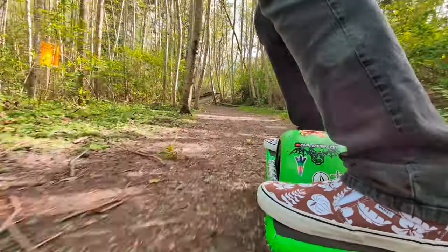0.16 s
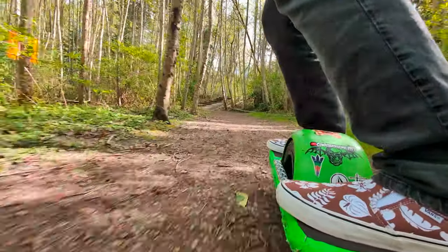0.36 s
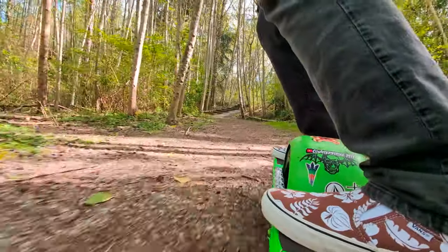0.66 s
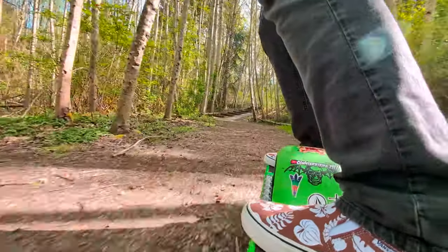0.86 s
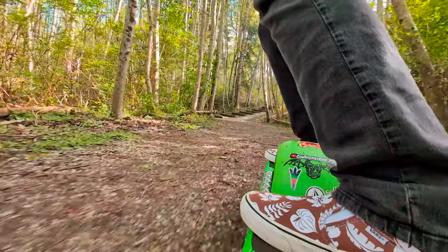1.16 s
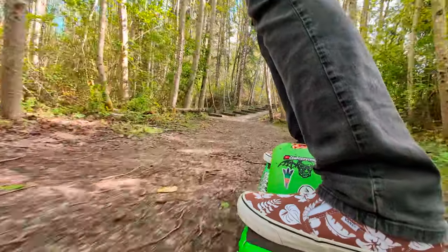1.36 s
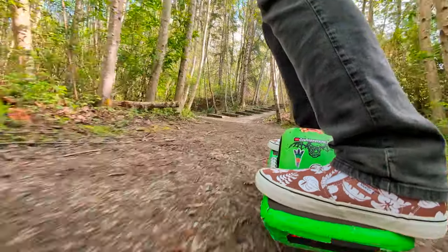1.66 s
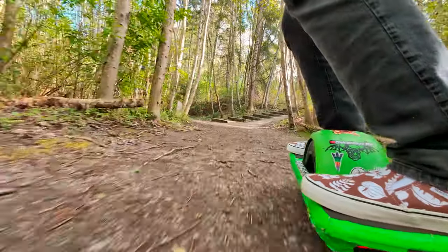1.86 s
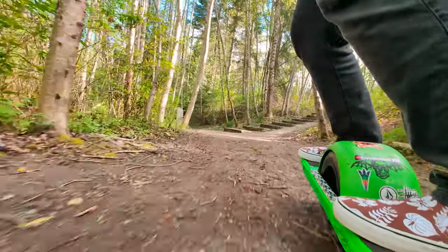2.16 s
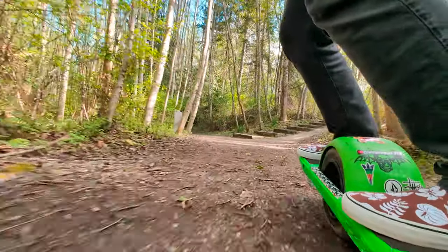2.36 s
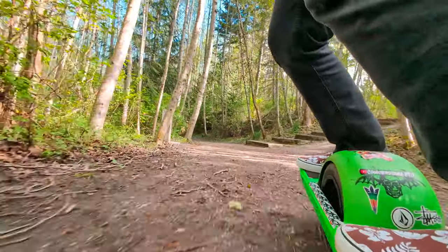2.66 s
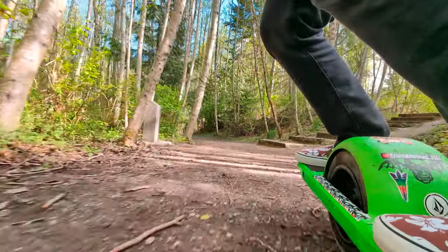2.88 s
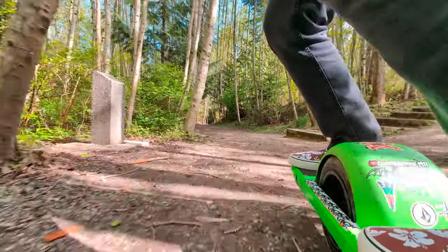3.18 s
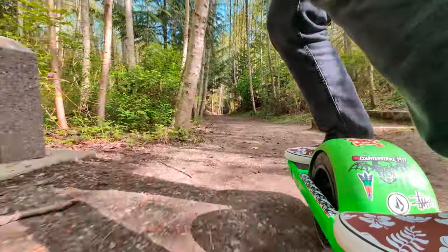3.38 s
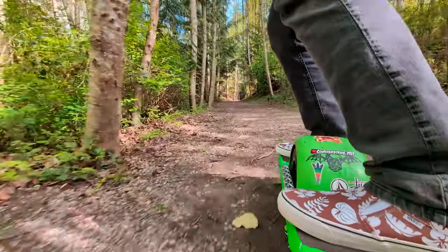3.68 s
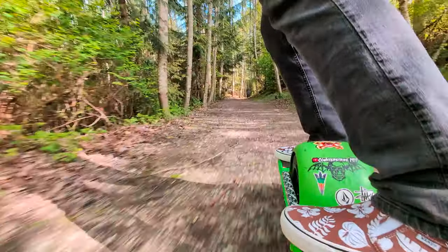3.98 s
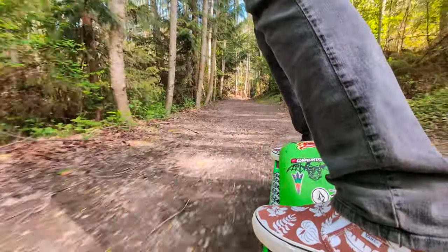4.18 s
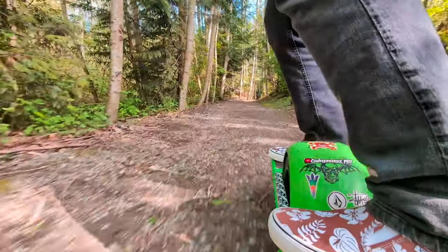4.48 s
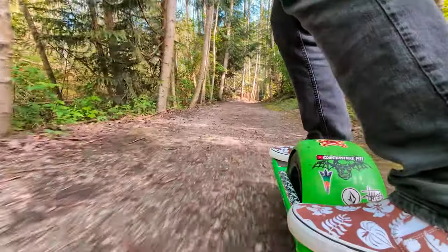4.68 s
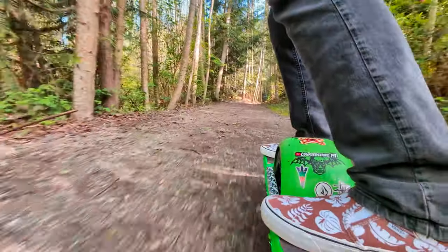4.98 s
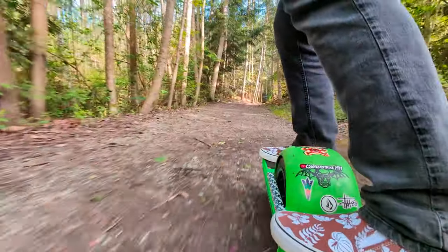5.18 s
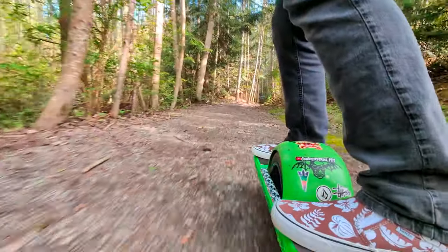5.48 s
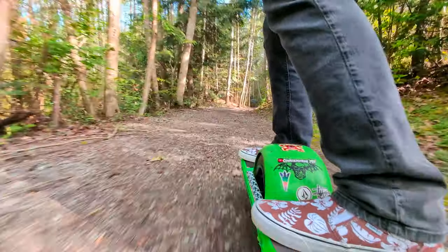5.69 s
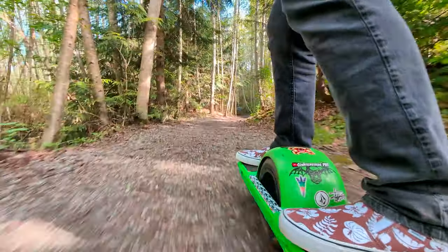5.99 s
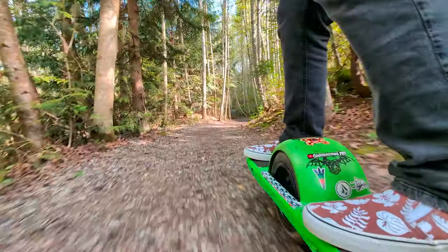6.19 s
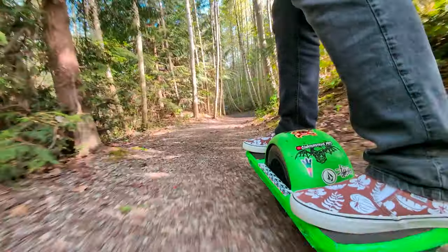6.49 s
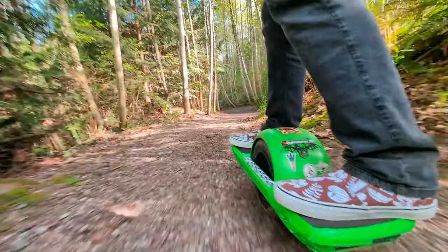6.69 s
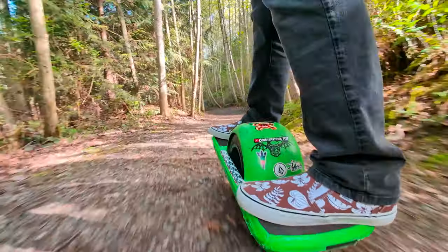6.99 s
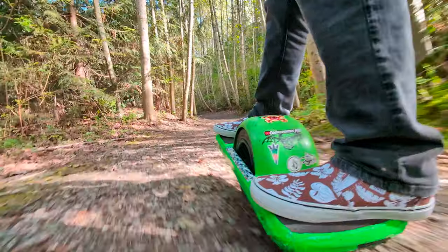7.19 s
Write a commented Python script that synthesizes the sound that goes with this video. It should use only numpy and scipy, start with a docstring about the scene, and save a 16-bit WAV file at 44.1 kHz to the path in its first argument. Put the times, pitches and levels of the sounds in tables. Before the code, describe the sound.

A one-wheeled electric board rolls steadily along a dirt and gravel forest trail, with the microphone very close and low in moving air. A hollow, wavering tire roar continues throughout, covered by granular crunch, tiny crackles and sandy hiss, leaning slightly right. From 0 to 2 s strong, low, irregular wind thumps buffet each side separately, mixed with short thuds and stone pops. From about 2 to 3.5 s wind drops and the tire is clearer; bright chips click sharply around 2.2-2.4 s and a stone pops hard at 2.65 s. Gusts return from 3.6 to 5 s, with a thud near 4.6 s, then thin out. Grit thickens after 5.5 s, with a sharp pop at 5.54 s. Crunch swells around 6.5 s with a heavy pop, and clustered pops and ticks at 7.2-7.3 s end it while still rolling. A barely audible, very high motor whine wavers beneath.

```python
"""Tyre roar and grit crunch under gusty wind thumps: a one-wheeled electric board on a dirt and gravel trail.
Tyre: noise flaring with each crushed grain, in four spectra from roar to hiss. Short ringing thuds are sines.
Stones pop as bent decaying sines, chips tick through a broad resonance, grains crack singly and in runs.
Wind: short noise swirls thump each microphone port separately over a lumpy draught; some spit in crack runs.
Motor: two faint sine lines."""
import sys
import numpy as np
from scipy import signal
from scipy.fft import rfft, irfft, next_fast_len
from scipy.io import wavfile
from scipy.ndimage import uniform_filter1d, map_coordinates

SR = 44100
rng = np.random.default_rng(int(sys.argv[2]) if len(sys.argv) > 2 else 0)


def bounce(signal):
    """Save signal as a 16-bit WAV file at the path given by the first command-line argument."""
    frames = np.transpose(np.atleast_2d(signal))
    limited = np.clip(frames, -1, 1)
    pcm = np.round(limited * 32767).astype(np.int16)
    wavfile.write(sys.argv[1], SR, pcm)


N = 323902


def amp(db):
    """Decibels to gain."""
    return 10 ** (np.asarray(db) / 20)


def unit(x):
    """Scale to rms 1."""
    return x / np.sqrt(np.mean(x ** 2) + 1e-20)


def along(points, hz):
    """Read (Hz, value) points on a log axis."""
    point_hz, values = np.transpose(points)
    return np.interp(np.log(hz + 1), np.log(point_hz + 1), values)


def curves(rows):
    """One value per sample for each column after the time."""
    time_s, *columns = np.transpose(rows)
    return [np.interp(np.arange(N) / SR, time_s, column) for column in columns]


def humps(rows):
    """Sum of smooth dB humps from (middle s, half length s, dB) rows."""
    t = np.arange(N) / SR
    return sum(db * np.exp(-((t - middle_s) / half_s) ** 2) for middle_s, half_s, db in rows)


def wobble(rate_hz):
    """Smooth random curve with rate_hz knots a second."""
    knots = rng.standard_normal(int(N * rate_hz / SR) + 4)
    return map_coordinates(knots, [np.arange(N) * rate_hz / SR])


def filtered(x, response):
    """Apply a complex response of frequency."""
    n = x.shape[-1]
    m = next_fast_len(n + SR // 8)
    return irfft(rfft(x, m) * response(np.fft.rfftfreq(m, 1 / SR)), m)[..., :n]


def add(track, start_s, sound):
    """Mix a sound into the track from start_s on."""
    start = round(start_s * SR)
    a, b = max(start, 0), min(start + sound.shape[-1], N)
    track[..., a:b] += sound[..., a - start:b - start]


def burst(direct_s, echo_s, echo_db, size):
    """Contact noise alike at both ports (the straight path), plus diffuse scatter off fender and ground."""
    t = np.arange(size) / SR
    direct = rng.standard_normal(size) * np.exp(-t / direct_s)
    scatter = rng.standard_normal((2, size)) * np.exp(-t / echo_s)
    return direct + amp(echo_db) * scatter


STRAY_SPREAD_DB, STRAY_OCTAVES = 4, 1.0  # full ranges for small stones and chips


def strays(rate_hz, level_db, pitch_hz):
    """Random (s, dB, Hz) rows of small hits whose size follows a level curve."""
    when, size, pitch = rng.random((int(rate_hz * N / SR), 3)).T
    db = level_db[(when * N).astype(int)] + STRAY_SPREAD_DB * (size - .5)
    hz = pitch_hz * 2 ** (STRAY_OCTAVES * (pitch - .5))
    return list(zip(when * N / SR, db, hz))


# motor switching lines: (frequency [Hz], relative level [dB])
WHINE_LINES = [(14039, 0), (14723, -4)]
# motor load: (time [s], whine level before random swell [dB])
MOTOR_LOAD = [(0, -63), (4.1, -63), (4.45, -59), (4.9, -62), (5.15, -55.5), (5.6, -55), (5.85, -65),
              (6.2, -58), (6.5, -64)]


def motor():
    """The drive's switching lines waver in phase and swell with the load."""
    t = np.arange(N) / SR
    lines = sum(amp(db) * np.sin(2 * np.pi * hz * t + 0.8 * wobble(20)) for hz, db in WHINE_LINES)
    return amp(curves(MOTOR_LOAD)[0] + 2 * wobble(4.8)) * lines


# wind spectrum at a port, for an eddy of ordinary size: (frequency [Hz], relative level [dB])
PORT_SPECTRUM = [(20, -28), (40, -2.5), (60, -5.5), (90, -1.5), (170, -0.5), (300, -3.5), (500, -9),
                 (800, -19.5), (1400, -28), (3000, -30.5), (9000, -24)]
EDDY_HZ = 193.5  # eddy pitch at which that spectrum is unshifted


def port(hz, pitch_hz=EDDY_HZ, lag_cycles=1.6):
    """Wind pressure response: small eddies sound higher; lows trail, so each thump sweeps down."""
    gain = amp(along(PORT_SPECTRUM, hz * EDDY_HZ / pitch_hz)) / np.sqrt(1 + (hz / 1100) ** 4)
    # steep bass cut, rings on after each thump
    b, a = signal.butter(N=7, Wn=53, btype="high", analog=True)
    low_cut = signal.freqs(b, a, worN=hz)[1]
    return gain * low_cut * np.exp(-2j * np.pi * lag_cycles * np.log(hz + 20))


# headwind strength: (time [s], reference level [dB])
HEADWIND_LEVEL = [(0.0, -22.5), (0.24, -29), (0.75, -23.5), (1.14, -26.5), (1.69, -31), (1.88, -35),
                  (2.19, -42), (3.33, -40), (4.11, -25), (4.21, -31), (5.46, -36), (6.44, -30),
                  (6.66, -34.5), (7.34, -37.5)]
SMALL_EDDY_RATE_HZ, SMALL_EDDY_S = 9, 0.018
SMALL_EDDY_DB, SMALL_EDDY_SPREAD_DB = 5, 3.5  # over the headwind, full range
SMALL_EDDY_HZ, SMALL_EDDY_OCTAVES = 195, 0.96  # mid pitch, full range
RIGHT_SHARE = .7  # chance of hitting the right port


def small_eddies():
    """Weak eddies at loosely even intervals, level following the headwind; rows like STRONG_EDDIES."""
    jitter, side, size, pitch = rng.random((int(SMALL_EDDY_RATE_HZ * N / SR), 4)).T
    time_s = (np.arange(len(jitter)) + jitter) / SMALL_EDDY_RATE_HZ
    headwind_db = np.interp(time_s, *np.transpose(HEADWIND_LEVEL))
    db = headwind_db + SMALL_EDDY_DB + SMALL_EDDY_SPREAD_DB * (size - .5)
    hz = SMALL_EDDY_HZ * 2 ** (SMALL_EDDY_OCTAVES * (pitch - .5))
    return list(zip(time_s, side < RIGHT_SHARE, db, np.full(len(time_s), SMALL_EDDY_S), hz))


# strong eddies: (time [s], port [0 left, 1 right], level [dB], length [s], pitch [Hz])
STRONG_EDDIES = [(0.028, 1, -15.5, 0.01, 190), (0.084, 0, -18, 0.018, 220), (0.086, 1, -14.5, 0.018, 200),
                 (0.254, 1, -23.5, 0.047, 180), (0.296, 1, -21, 0.027, 130), (0.388, 1, -16, 0.028, 200),
                 (0.418, 0, -10, 0.023, 151), (0.429, 1, -11, 0.019, 232), (0.442, 0, -13, .004, 520),
                 (0.491, 0, -11, 0.013, 245), (0.566, 1, -11.5, 0.017, 170), (0.6, 0, -10, 0.017, 310),
                 (0.615, 1, -19, 0.022, 200), (0.666, 1, -21, .02, 190), (0.69, 0, -21, 0.019, 190),
                 (0.709, 1, -7, 0.032, 235), (0.749, 0, -22, 0.017, 190), (0.8, 0, -14, 0.012, 200),
                 (0.831, 1, -13, 0.02, 300), (0.898, 0, -18, 0.037, 190), (0.906, 1, -16, 0.037, 200),
                 (0.991, 1, -14, 0.024, 340), (1.088, 0, -14, 0.0079, 200), (1.16, 0, -20, 0.016, 200),
                 (1.167, 1, -16, 0.058, 220), (1.23, 0, -13, 0.0084, 380), (1.273, 1, -12.5, 0.008, 230),
                 (1.273, 0, -17, 0.014, 200), (1.343, 0, -20, 0.019, 179), (1.372, 1, -19, 0.016, 190),
                 (1.413, 0, -20.5, 0.044, 187), (1.48, 1, -21, 0.048, 191), (1.513, 0, -15.5, 0.025, 169),
                 (1.529, 0, -19, .005, 480), (1.577, 1, -8.5, 0.021, 304), (1.597, 1, -14, 0.0048, 560),
                 (1.619, 1, -9.5, 0.0085, 181), (1.642, 0, -20, 0.024, 190), (1.649, 1, -13, 0.019, 204),
                 (1.681, 1, -18, .008, 200), (1.712, 1, -12, 0.012, 192), (1.783, 0, -19, 0.018, 190),
                 (1.823, 0, -17, 0.034, 288), (1.842, 1, -17.5, 0.049, 200), (1.88, 1, -9, 0.03, 234),
                 (1.968, 1, -10.5, 0.012, 264), (2.21, 1, -20.5, 0.01, 130), (2.439, 1, -21, 0.025, 138),
                 (2.849, 1, -22.5, 0.024, 260), (3.003, 1, -18, 0.027, 210), (3.243, 1, -25, 0.033, 135),
                 (3.517, 1, -17.5, 0.011, 150), (3.6, 1, -18, .012, 190), (3.626, 1, -11.5, 0.026, 125),
                 (3.668, 1, -20.5, .018, 125), (3.765, 1, -11, 0.018, 224), (3.785, 0, -18, 0.011, 190),
                 (3.86, 1, -17.5, 0.024, 200), (3.911, 1, -9, 0.015, 201), (3.921, 0, -20, 0.04, 200),
                 (4.005, 1, -9, 0.022, 160), (4.055, 1, -22.5, 0.05, 141), (4.06, 0, -22.5, .04, 191),
                 (4.18, 1, -13, 0.016, 192), (4.211, 1, -12, 0.012, 253), (4.223, 0, -17, 0.039, 300),
                 (4.242, 1, -11.5, 0.027, 235), (4.266, 1, -12.5, 0.015, 610), (4.29, 0, -24, 0.037, 190),
                 (4.295, 1, -14, 0.025, 219), (4.322, 1, -19, 0.014, 560), (4.409, 1, -14.5, 0.022, 159),
                 (4.476, 0, -18, 0.023, 190), (4.48, 1, -17.5, 0.021, 170), (4.514, 1, -13.5, 0.021, 172),
                 (4.555, 1, -7.5, 0.0072, 265), (4.704, 1, -14.5, 0.022, 230),
                 (4.774, 1, -11.5, 0.011, 257), (4.825, 1, -14.5, 0.008, 190),
                 (4.878, 1, -13.5, 0.0098, 280), (5.045, 1, -9.5, 0.013, 277), (5.275, 1, -24, 0.013, 190),
                 (5.313, 1, -14, 0.0077, 230), (5.466, 1, -14.5, 0.016, 200), (5.549, 1, -17, 0.023, 203),
                 (6.016, 1, -14.5, 0.02, 194), (6.201, 1, -22, 0.054, 147.3), (6.764, 1, -21, 0.048, 185)]
# gusty, lumpy draught, rows left and right port: (level over the headwind [dB])
DRAUGHT_LEVEL = [
    [-4.5],
    [-0.5],
]


def wind():
    """Short eddies are single thumps, long ones flutter; each port has its own, over a lumpy draught."""
    out, t = np.zeros((2, N)), np.arange(-SR // 8, SR // 5) / SR
    for time_s, side, db, length_s, pitch_hz in STRONG_EDDIES + small_eddies():
        core_s = max(length_s - .007, .003)
        swirl = rng.standard_normal(len(t)) * np.exp(1.15 * rng.standard_normal(len(t)))
        envelope = np.exp(-(t / (0.88 * core_s)) ** 2)
        thump = filtered(swirl * envelope, lambda hz: port(hz, pitch_hz))
        level = amp(db) * np.sqrt(length_s * SR / np.sum(thump ** 2))  # energy of rms db over length_s
        add(out[int(side > .5)], time_s + t[0], level * thump)
    lumps = amp(6.7 * np.array([wobble(22), wobble(22)]))
    draught = unit(filtered(lumps * rng.standard_normal((2, N)), port))
    return out + amp(curves(HEADWIND_LEVEL)[0] + np.array(DRAUGHT_LEVEL)) * draught


# roots under the tyre and hard starts of wind thumps: (time [s], peak level [dB], pitch [Hz])
RINGING_THUDS = [(0.437, -12.5, 710), (0.703, -9, 490), (0.834, -8.5, 545), (1.524, -18, 700),
                 (4.596, -8.5, 563), (4.999, -19.5, 750), (5.047, -12, 530), (6.519, -9, 520),
                 (6.766, -12, 545), (7.301, -11, 547)]


def ringing_thuds():
    """A thud is a sine that swells fast and dies within a few dozen milliseconds."""
    out, t = np.zeros(N), np.arange(SR // 15) / SR
    for time_s, db, hz in RINGING_THUDS:
        ring = np.sin(2 * np.pi * hz * t) * (1 - np.exp(-t / 0.00033)) * np.exp(-t / 0.0038)
        add(out, time_s, amp(db) * ring / abs(ring).max())
    return out


# big chips hitting the board: (time [s], peak level [dB], pitch [Hz], skitter re contact [dB])
BIG_CHIPS = [(0.231, -17, 7000, -16), (0.4846, -13, 5570, -15), (0.536, -14, 7500, -16),
             (0.782, -11.5, 9230, -10), (0.8593, -19, 8500, -18), (1.05, -10, 6300, -14),
             (1.12, -23, 5000, 0), (1.195, -13.5, 5500, -22), (1.4192, -16, 8080, -16),
             (1.453, -18, 8000, -15), (1.661, -19, 8150, -18), (1.8154, -12.5, 6130, -12),
             (2.0154, -15, 5040, -17), (2.124, -14, 8000, -16), (2.182, -13, 9000, -16),
             (2.213, -13, 12000, -20), (2.2285, -14, 4200, -18), (2.2479, 3, 8100, -29),
             (2.2979, -6.5, 7600, -13), (2.3494, -6, 9000, -19), (2.465, -10.5, 6000, -16),
             (2.6503, -12, 5500, -25), (2.7052, -13, 9280, -19), (2.7706, -12.5, 11000, -18),
             (3.004, -11, 9070, -17), (3.058, -12.5, 3540, -13), (3.0985, -16, 8000, -22),
             (3.324, -13, 4500, -14.5), (3.5814, -15, 3600, -20), (3.69, -6.5, 8400, -14),
             (3.6997, -18, 8000, -13), (3.729, -9, 4200, -18), (4.0884, -18, 5600, -4),
             (4.2386, -18, 9140, -8.5), (4.539, -15, 11030, -16), (4.71, -19, 6000, -12),
             (5.4288, -21, 4000, -12), (5.529, -10.5, 6770, -10), (5.557, -16, 5140, -11),
             (5.843, -16.5, 9100, -13), (6.1043, -11, 8100, -17), (6.213, -13, 8000, -16),
             (6.236, -13, 6000, -14.5), (6.586, -18, 7100, -18), (6.702, -6.5, 3600, -5),
             (6.961, -15.5, 8000, -15), (7.124, -17, 8500, -10), (7.185, -13.5, 8060, -2),
             (7.198, -16, 7500, -4), (7.271, -12, 7000, -17), (7.2996, -9, 9050, -9)]
SMALL_CHIP_RATE_HZ, SMALL_CHIP_DB = 4.5, 14.5  # dB over the sand curve
SMALL_CHIP_HZ, SMALL_SKITTER_DB = 7500, -15
CHIP_WIDTH = 0.92  # resonance bandwidth / pitch


def chips():
    """A flung chip ticks with a broad resonance, then skitters; stray chips are louder on sandier ground."""
    out = np.zeros((2, N))
    sand_db = curves(TRAIL_LEVELS)[2]
    small = strays(SMALL_CHIP_RATE_HZ, sand_db + SMALL_CHIP_DB, SMALL_CHIP_HZ)
    for time_s, db, hz, skitter_db in BIG_CHIPS + [(*row, SMALL_SKITTER_DB) for row in small]:
        contact = burst(direct_s=0.00021, echo_s=0.0059, echo_db=skitter_db, size=SR // 25)
        tick = filtered(contact, lambda f: 1j * f * hz / (hz * hz - f * f + 1j * f * hz * CHIP_WIDTH))
        add(out, time_s + 0.00057, amp(db) * tick / abs(tick).max())
    return out


# big stones squeezed from under the tread:
# (time [s], pop peak [dB], settled pitch [Hz], snap re pop [dB], life [cycles])
BIG_STONES = [(0.0508, -10, 1260, -18, 1.7), (0.439, -17, 1650, 3, 1), (0.536, -13.5, 1000, -16, 0.97),
              (0.615, -13.5, 1350, -15, 1.3), (0.78, -11.5, 2060, 1.5, 0.89), (0.901, -8, 1610, -7, 1.8),
              (1.05, -24, 1950, -5, 0.91), (1.195, -12.5, 2520, -10, 1.5), (1.2255, -12, 1040, -12, 1.6),
              (1.269, -11, 1120, -22, 1.3), (1.285, -8, 865, -10, 1.2), (1.568, -13, 1550, 5, 1.4),
              (1.622, -15, 1290, -14, 1.1), (1.83, -14.5, 1400, -12, 1.2), (1.8875, -7, 1400, 0, 0.93),
              (1.972, -22, 1290, -16, 1.1), (2.0146, -10.5, 1430, 3.5, 1.4), (2.2483, -14, 1400, -5, 1.1),
              (2.35, -16, 1250, -9, 0.97), (2.422, -16, 1200, -20, 1.1), (2.6497, -3, 1750, -1, 1.23),
              (2.993, -12.5, 1000, -17, 1.4), (3.756, -18, 1200, -18, 1), (3.9726, -14, 1370, -6, 1.4),
              (4.009, -21, 1610, -17, 1.2), (4.5575, -8, 2070, -11, 1.65), (4.739, -19.5, 920, -23, 1.5),
              (4.9176, -5, 1100, -14, 1.24), (4.998, -14.5, 900, -5, 0.92), (5.484, -17, 1170, -24, 1.8),
              (5.541, -4.5, 1150, -10, 1.5), (5.796, -13, 1230, -13, 1.1), (6.104, -16, 1950, -1, 1.1),
              (6.3424, -7, 1600, -1, 1.2), (6.5574, -0.5, 1130, -30, 1.7), (6.6525, -10.5, 1260, -20, 1.4),
              (6.711, -13, 1280, -14, 1.2), (6.853, -6.5, 1300, -15, 1.5), (7.071, -7.5, 1290, -22, 1.12),
              (7.184, -4.5, 1280, -17, 1.2), (7.199, -0.5, 1150, -22, 1.15), (7.308, -5.5, 1200, -20, 0.86)]
SMALL_STONE_RATE_HZ, SMALL_STONE_DB, SMALL_STONE_HZ = 2, -3, 1310  # dB over the rolling curve
SMALL_SNAP_DB, SMALL_STONE_CYCLES = -27, 0.88
STONE_BEND_CYCLES = 0.14  # gained by the high start as the rubber lets go
SNAP_HZ, SNAP_S, SPLINTER_DB = 3500, 0.00022, -5


def stones():
    """A stone leaves the rubber with a pop that starts high and sags, a dry snap and fender scatter."""
    out, t = np.zeros((2, N)), np.arange(SR // 20) / SR
    rolling_db = curves(TRAIL_LEVELS)[0]
    small = strays(SMALL_STONE_RATE_HZ, rolling_db + SMALL_STONE_DB, SMALL_STONE_HZ)
    rows = BIG_STONES + [(*row, SMALL_SNAP_DB, SMALL_STONE_CYCLES) for row in small]
    for time_s, db, hz, snap_db, life_cycles in rows:
        cycles = hz * t + STONE_BEND_CYCLES * (1 - np.exp(-2 * hz * t))
        pop = np.sin(2 * np.pi * cycles) * cycles * np.exp(-(cycles / life_cycles) ** 2)
        splinter_noise = burst(direct_s=0.00063, echo_s=0.0094, echo_db=-19.0, size=len(t))
        splinters = filtered(splinter_noise, lambda f: amp(along(GRIT_SPECTRUM, f)))
        snap = np.sin(2 * np.pi * SNAP_HZ * t) * np.exp(-t / SNAP_S)
        snap = snap + amp(SPLINTER_DB) * splinters / abs(splinters).max()
        scatter_noise = burst(direct_s=0.0013, echo_s=0.0068, echo_db=18, size=len(t))
        scatter = filtered(scatter_noise, lambda f: amp(along(CRUNCH_SPECTRUM, f)))
        sound = pop / abs(pop).max() + amp(snap_db) * snap / abs(snap).max()
        sound = sound + amp(-15.5) * scatter / abs(scatter).max()
        add(out, time_s + .0005, amp(db) * sound)
    return out


CRACK_CYCLES, CRACK_SCATTER_DB = 0.9, -18  # life, scatter re pop


def crack(hz):
    """One crack: a pop of a cycle or two at both ports, then a faint scatter."""
    t = np.arange(SR // 100) / SR
    cycles = hz * t
    ring = np.gradient(np.sin(2 * np.pi * cycles) * cycles * np.exp(-(cycles / CRACK_CYCLES) ** 2))
    tail = rng.standard_normal((2, len(t))) * np.exp(-t / 0.0039)
    scatter = signal.fftconvolve(tail, ring[None], axes=1)[:, :len(t)]
    return ring / abs(ring).max() + amp(CRACK_SCATTER_DB) * scatter / abs(scatter).max()


# crumbling clods and wind spit: (time [s], length [s], level [dB], mid pitch [Hz])
CRACK_RUNS = [(0.047, .01, -25.5, 1850), (0.226, 0.013, -29.5, 2000), (0.325, .005, -30, 2500),
              (0.431, 0.016, -31, 2280), (0.587, 0.0048, -28, 2300), (0.834, 0.034, -29, 2390),
              (1, 0.0056, -28, 2800), (1.15, 0.0069, -35, 2340), (1.189, 0.0079, -34, 1830),
              (1.266, 0.025, -24, 1250), (1.477, 0.018, -26.5, 1900), (1.566, 0.037, -27, 2090),
              (1.895, 0.013, -30, 1800), (3.971, 0.0064, -24, 1500), (4.077, .02, -35, 2470),
              (4.168, 0.0055, -32, 2770), (4.239, 0.0068, -32, 2610), (4.26, 0.013, -28, 2200),
              (4.293, 0.0087, -32, 2400), (4.316, 0.0063, -30, 2490), (4.551, 0.009, -20.5, 2100),
              (5.143, .005, -34, 2100), (5.407, 0.0033, -30, 2280), (5.652, 0.0024, -24, 2450),
              (5.893, 0.0026, -23.5, 2540), (6.34, 0.0083, -22, 1900), (6.697, .012, -36, 2800),
              (6.854, 0.0081, -27, 1960), (7.082, 0.0043, -30, 2000), (7.19, 0.019, -31.5, 2200)]
RUN_RATE_HZ, RUN_SPREAD_DB, RUN_OCTAVES = 630, 8, 1.3  # cracks, full ranges


def crack_runs():
    """A crumbling clod or wind spit is a short, quick run of cracks."""
    out = np.zeros((2, N))
    for time_s, length_s, db, mid_hz in CRACK_RUNS:
        run, count = np.zeros((2, N)), max(int(RUN_RATE_HZ * length_s), 2)
        for k, (jitter, size, pitch) in enumerate(rng.random((count, 3))):
            hz = mid_hz * 2 ** (RUN_OCTAVES * (pitch - .5))
            crack_s = time_s + length_s * (k + jitter) / count
            add(run, crack_s, amp(RUN_SPREAD_DB * size) * crack(hz))
        out += amp(db) * run * np.sqrt(2 * length_s * SR / np.sum(run ** 2))
    return out


TICK_RATE_HZ, TICK_DB, TICK_SPREAD_DB = 95, 10.3, 4.4  # dB over the grit curve, exponential spread
TICK_HZ, TICK_OCTAVES = 2200, 1.5  # mid pitch, full range


def crackle():
    """Single grains crack clear of the crunch, louder where the trail is gritty."""
    out, grit_db = np.zeros((2, N)), curves(TRAIL_LEVELS)[1]
    for when, size, pitch in rng.random((int(TICK_RATE_HZ * N / SR), 3)):
        extra_db = TICK_SPREAD_DB * min(-np.log(1 - size), np.log(16))
        db = grit_db[int(when * N)] + TICK_DB + extra_db
        hz = TICK_HZ * 2 ** (TICK_OCTAVES * (pitch - .5))
        add(out, when * N / SR, amp(db) * crack(hz))
    return out


def contacts(rate_hz, spread_db, life_s, smooth):
    """Two noises that flare with each grain crushed and die away in life_s, over a smooth share."""
    count = int(rate_hz * N / SR)
    draw = rng.random((count, 2))
    sizes = amp(spread_db * np.minimum(-np.log(1 - draw[:, 1]), np.log(60)))
    energy = np.bincount((draw[:, 0] * N).astype(int), sizes ** 2, N)
    flare = signal.lfilter([1], [1, -np.exp(-1 / (life_s * SR))], energy)
    return np.sqrt(flare / flare.mean() + smooth) * rng.standard_normal((2, N))


def speckled(pair, depth_db):
    """Every grain has its own colour: small random patches of gain in time and pitch."""
    z = signal.stft(pair, SR, nperseg=512)[2]
    field = uniform_filter1d(rng.standard_normal(z.shape[1:]), size=7, axis=0)
    field = uniform_filter1d(field, size=3, axis=1)
    return signal.istft(z * amp(depth_db * unit(field)), SR, nperseg=512)[1][:, :N]


# left-right likeness: (frequency [Hz], correlation [0-1])
STEREO_LIKENESS = [(100, 0.11), (300, 0.54), (600, 0.87), (1300, 0.84), (3200, 0.66), (4500, 0.32),
                   (7000, 0.3), (15000, 0.042)]


def coloured(pair, spectrum):
    """Two noises as stereo of rms 1, alike in the middle range and diffuse in the treble."""
    def mid_side_gain(hz):
        turn = np.arccos(np.clip(along(STEREO_LIKENESS, hz), -1, 1)) / 2
        return amp(along(spectrum, hz)) * [np.cos(turn), np.sin(turn)]
    mid, side = filtered(pair, mid_side_gain)
    return unit(np.array([mid + side, mid - side]))


# grit spectrum at GRIT_HZ: (frequency [Hz], relative level [dB])
GRIT_SPECTRUM = [(600, -34), (1200, 6), (1700, -1), (2300, -0.5), (3000, 5.5), (3900, -0.5), (4900, -16),
                 (7000, -14.5), (10000, -42), (16000, -43)]
GRIT_HZ = 3000  # pitch at which that spectrum is unshifted


def gliding(pair, pitch_hz):
    """The grit's broad resonance slides with the ground and the lean of the board, at a steady level."""
    hz, frame_s, z = signal.stft(pair, SR, nperseg=256)
    shift = GRIT_HZ / np.interp(frame_s, np.arange(N) / SR, pitch_hz)
    gain = amp(along(GRIT_SPECTRUM, hz[:, None] * shift))
    return signal.istft(z * gain / np.linalg.norm(gain, axis=0), SR, nperseg=256)[1][:, :N]


FLEX, FLEX_RATE_HZ = 0.03, 22  # scale of the pitch waver as a share, knot rate


def flexing(pair):
    """The tyre flexes over the ground, so its hollow note wavers in pitch."""
    drift = np.cumsum(FLEX * wobble(FLEX_RATE_HZ))
    return np.array([map_coordinates(side, [np.arange(N) + drift], mode="mirror") for side in pair])


# trail under the tyre, before layer offsets: (time [s], rolling [dB], grit [dB], sand [dB])
TRAIL_LEVELS = [(0.0, -23.5, -36.5, -38), (0.6, -23.5, -43, -41.5), (1.2, -22.5, -35, -42),
                (1.35, -24.5, -42, -41), (1.5, -22, -36, -36), (1.95, -28, -44.5, -40),
                (2.25, -26.5, -43, -37.5), (2.85, -30, -44, -40), (3.3, -27.5, -42.5, -39.5),
                (3.45, -29, -48.5, -43.5), (3.74, -27, -44.5, -37.5), (4.1, -26.5, -39, -43),
                (4.49, -24, -45.5, -43.5), (4.94, -25, -45, -42), (5.09, -25.5, -54, -45),
                (5.69, -22.5, -36.5, -41.5), (5.95, -21.5, -37.5, -40), (6.74, -24, -37.5, -42.5),
                (7.04, -23.5, -47, -44), (7.34, -22.5, -42, -41)]
# grit resonance: (time [s], pitch [Hz])
GRIT_PITCH_HZ = [(0, 3000), (0.8, 3000), (1.5, 3020), (2.25, 3970), (3.2, 2900), (4.3, 2780), (5.7, 2620),
                 (6.25, 2800), (6.7, 3540), (7.2, 2700)]
# looser and firmer patches of gravel: (middle [s], half length [s], crunch change, up or down [dB])
GRAVEL_PATCHES = [(0.33, 0.017, 6), (0.87, 0.031, 4), (1.26, 0.048, 3.5), (1.58, 0.045, 4),
                  (3.68, 0.087, 1.5), (4.09, 0.03, 1.5), (4.29, 0.066, -3.5), (4.6, 0.037, 3.5),
                  (6.57, 0.34, 5), (6.93, 0.047, 6.5), (7.3, 0.16, 7.5)]
# swells and dips that load or unload the tyre: (middle [s], half length [s], roar change [dB])
LOAD_SWELLS = [(0.24, 0.13, -3), (1.73, 0.03, -16), (1.86, 0.12, 4.5), (3.02, 0.057, 5), (3.79, 0.038, -8),
               (4.25, 0.053, -1), (4.42, 0.084, -3), (4.93, 0.091, 5.5), (5.61, 0.045, -4.5)]
# tyre and fender spectrum: (frequency [Hz], relative level [dB])
ROAR_SPECTRUM = [(25, -50), (40, -23), (70, -6), (150, -13.5), (280, -16), (400, -5.5), (480, -3.5),
                 (548, 1.2), (625, -8), (780, -8.5), (1000, -22.5), (1600, -26), (4000, -90)]
# crunch spectrum: (frequency [Hz], relative level [dB])
CRUNCH_SPECTRUM = [(40, -50), (200, -22), (550, -2), (850, -2.5), (1200, -0.5), (1550, -9), (1900, -15),
                   (3000, -19.5), (8000, -32)]
# sand spectrum: (frequency [Hz], relative level [dB])
SAND_SPECTRUM = [(100, -32), (1500, -2.5), (3800, -3.5), (5000, -1), (5800, 0.5), (7200, -3.5),
                 (8300, -0.5), (9300, 2), (11000, -6), (13000, -6.5), (15000, -4.5), (16500, -23)]
# crushed ground, coarse to fine: (grains per s, size spread dB, life s, smooth share)
DRUMMING, PEBBLES = (350, 3.5, 0.0011, 1.43), (340, 1.9, 0.00079, 0.8)
GRAVEL, DUST = (460, 1.9, 0.00059, 1.9), (500, 4.44, 0.0012, 0.54)
ROAR_DB, CRUNCH_DB, GRIT_DB, SAND_DB = -2.27, -7.5, 0, -0.5  # over the trail curves; crunch uses rolling
ROAR_BUMP_DB, CRUNCH_BUMP_DB, GRIT_BUMP_DB, SAND_BUMP_DB = 1.1, 1.4, 0.9, 0.7
BUMP_RATE_HZ, JOLT_RATE_HZ, JOLT_DB = 17, 70, 0.96
GRIT_SHARE, SAND_SHARE = 0.24, 0.85  # of a patch's dB change
LOAD_SHARE = 0.38  # of the load dB, to crunch and grit


def tyre():
    """Coarse grains drum the tyre, finer ones crunch and hiss; trail bumps press them all at once."""
    rolling_db, grit_db, sand_db = curves(TRAIL_LEVELS)
    grit_hz, = curves(GRIT_PITCH_HZ)
    patch_db, load_db = humps(GRAVEL_PATCHES), humps(LOAD_SWELLS)
    bumps, jolt_db = wobble(BUMP_RATE_HZ), JOLT_DB * wobble(JOLT_RATE_HZ)

    drumming = contacts(*DRUMMING)
    pebbles = speckled(contacts(*PEBBLES), depth_db=1.5)
    gravel = speckled(contacts(*GRAVEL), depth_db=4.5)
    dust = speckled(contacts(*DUST), depth_db=2.5)

    roar_db = rolling_db + ROAR_DB + load_db + jolt_db + ROAR_BUMP_DB * bumps
    crunch_db = rolling_db + CRUNCH_DB + patch_db + LOAD_SHARE * load_db + jolt_db + CRUNCH_BUMP_DB * bumps
    grit_db = grit_db + GRIT_DB + GRIT_SHARE * patch_db + LOAD_SHARE * load_db
    grit_db = grit_db + jolt_db + GRIT_BUMP_DB * bumps
    sand_db = sand_db + SAND_DB + SAND_SHARE * patch_db + SAND_BUMP_DB * bumps

    roar = amp(roar_db) * flexing(coloured(drumming, ROAR_SPECTRUM))
    crunch = amp(crunch_db) * coloured(pebbles, CRUNCH_SPECTRUM)
    grit = amp(grit_db) * coloured(gliding(gravel, grit_hz), [(1000, 0)])  # flat: already shaped
    sand = amp(sand_db) * coloured(dust, SAND_SPECTRUM)
    return roar + crunch + grit + sand


# board swing to the right: (time [s], left port delay [s])
BOARD_SWING = [(0, 0.00015), (1.2, 0.00011), (1.8, 0.00014), (2.15, 0.00023), (3.0, 0.00022),
               (3.75, 0.00015), (5.7, .00012), (6.55, 0.00016), (6.95, 0.00006), (7.34, 0.000084)]


def scene():
    """All but the eddies and draught come from the right, reaching the left port a little later."""
    left, right = tyre() + crackle() + crack_runs() + ringing_thuds() + stones() + chips() + motor()
    late_left = map_coordinates(left, [np.arange(N) - curves(BOARD_SWING)[0] * SR], order=5)
    return np.array([late_left, right]) + wind()


LOW_CUT_HZ, TOP_HZ = 36, 16000


def record(dry):
    """Round off the tallest peaks, roll off the bass and remove everything from TOP_HZ up."""
    rounded = dry / (1 + (dry / .95) ** 6) ** (1 / 6)
    return filtered(rounded, lambda hz: (hz < TOP_HZ) * hz ** 4 / np.sqrt(hz ** 8 + LOW_CUT_HZ ** 8))


dry = scene()
out = record(dry)
bounce(out)
```